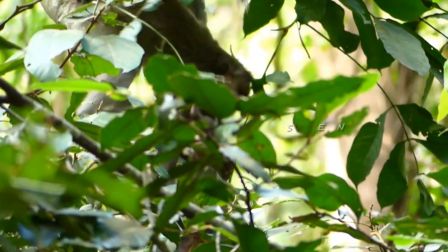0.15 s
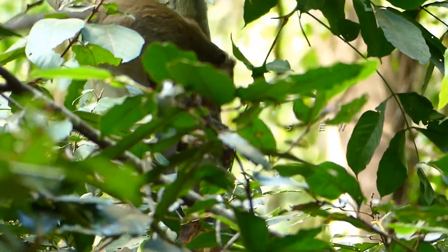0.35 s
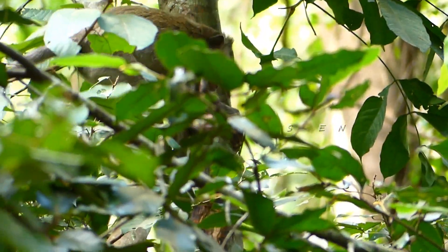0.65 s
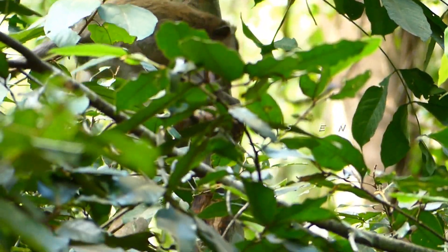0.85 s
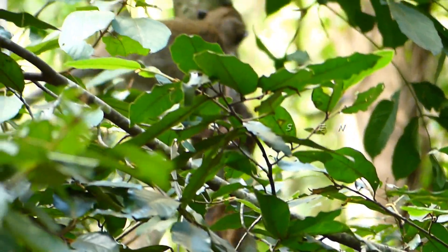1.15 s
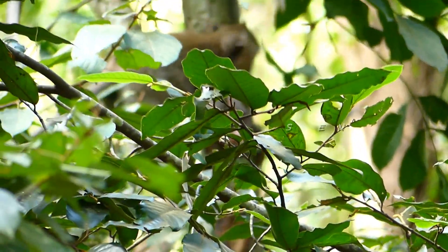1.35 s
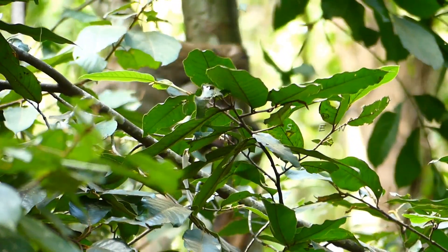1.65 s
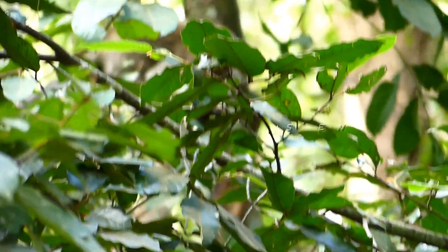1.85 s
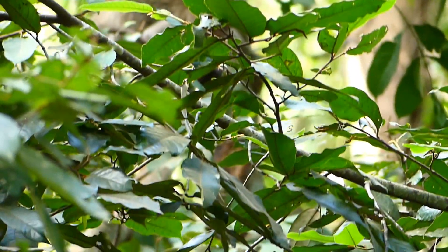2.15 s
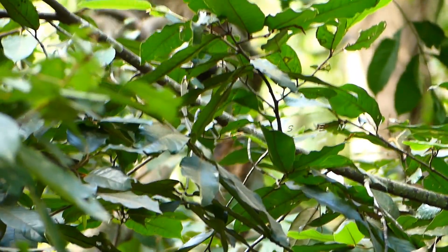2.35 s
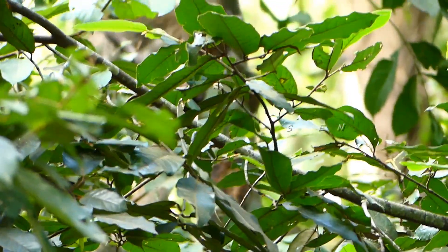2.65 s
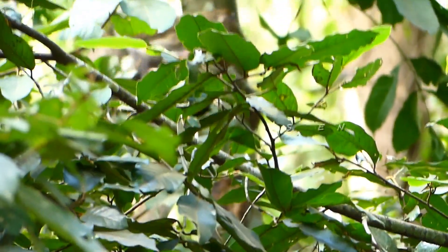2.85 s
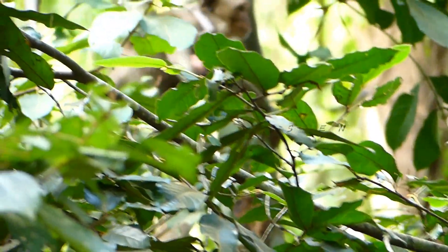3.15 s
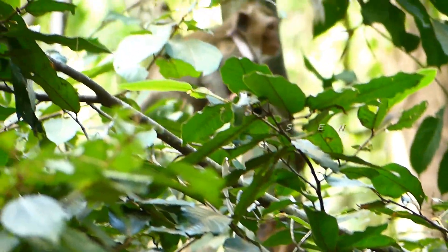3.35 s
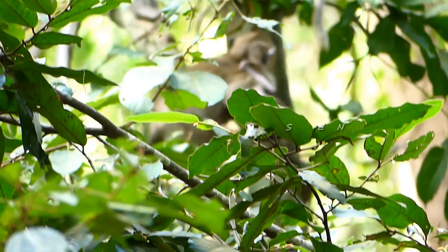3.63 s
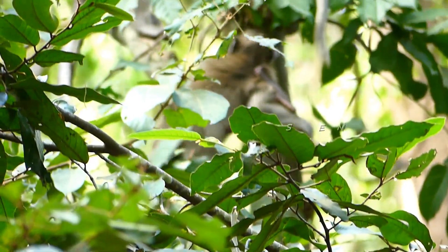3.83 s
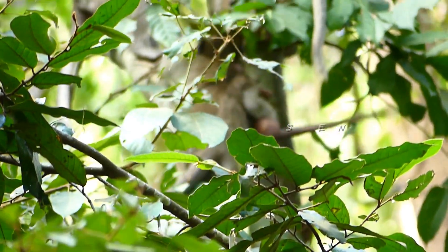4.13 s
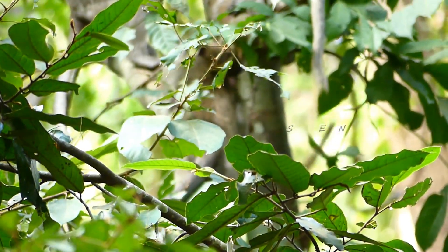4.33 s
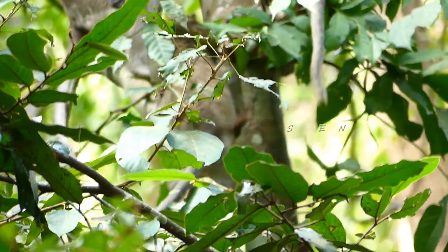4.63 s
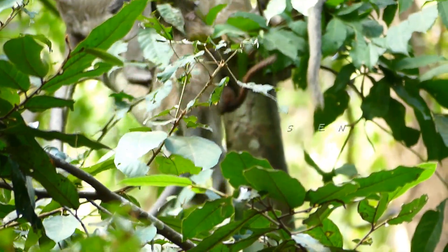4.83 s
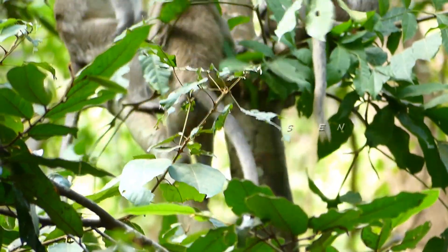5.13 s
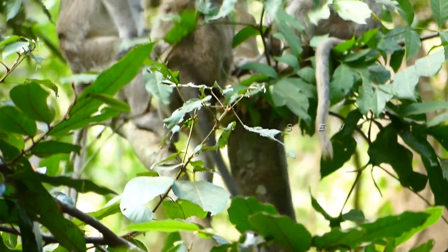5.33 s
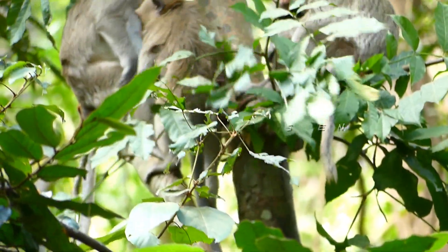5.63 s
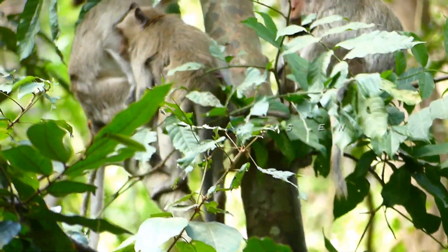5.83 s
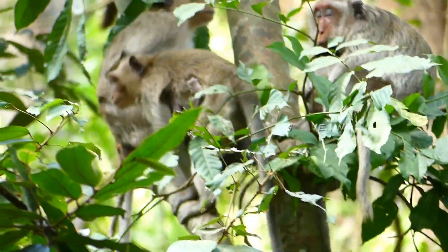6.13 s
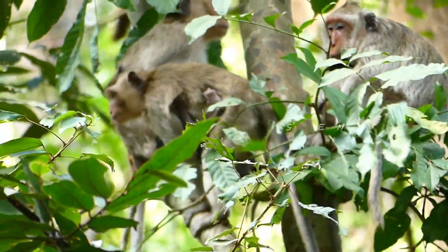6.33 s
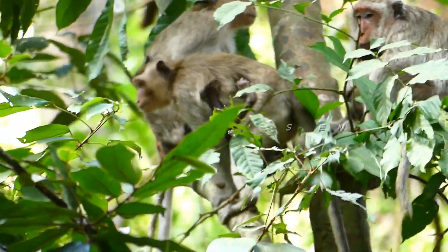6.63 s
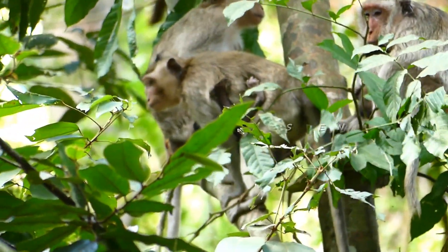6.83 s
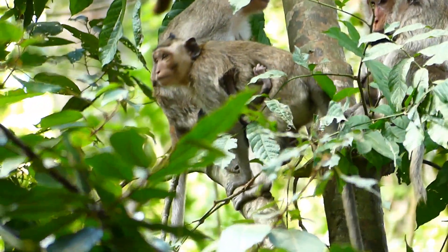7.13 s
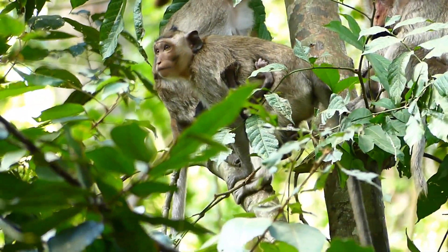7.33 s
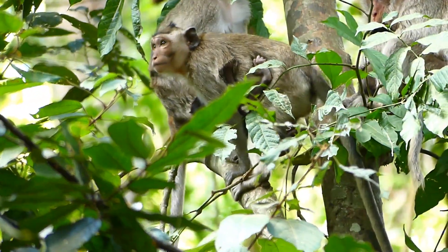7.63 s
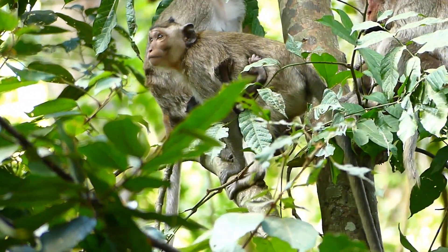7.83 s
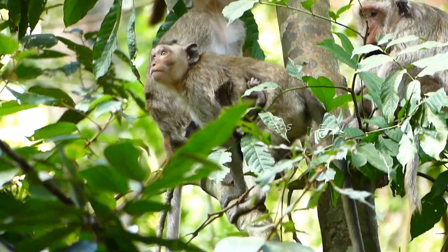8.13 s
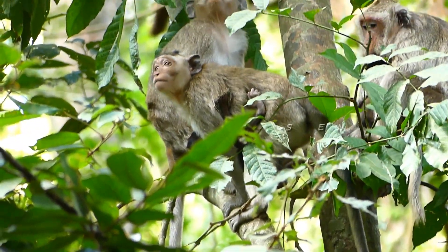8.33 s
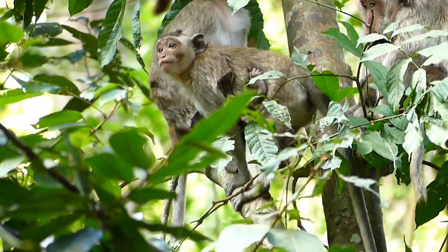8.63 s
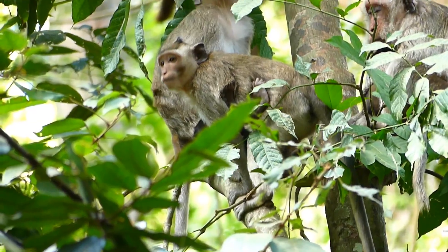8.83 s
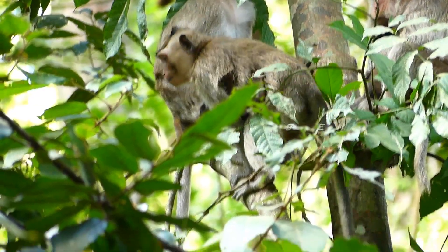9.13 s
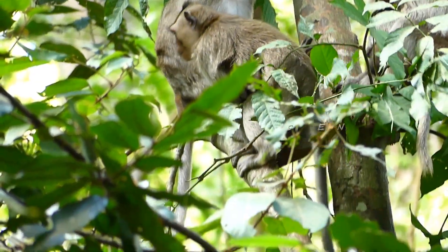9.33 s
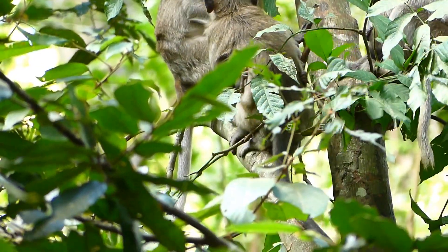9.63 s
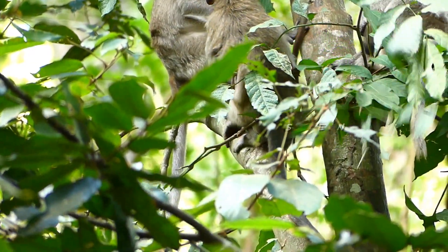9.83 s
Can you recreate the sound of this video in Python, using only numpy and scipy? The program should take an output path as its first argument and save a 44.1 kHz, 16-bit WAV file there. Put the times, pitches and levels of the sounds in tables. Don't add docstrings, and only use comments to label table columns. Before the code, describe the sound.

Several forest birds give short, high whistles that mostly slide downward, some clear and some slightly hoarse, thickest around three to four seconds. Leaves and branches rustle in short bursts, with crisp scrapes and twig ticks close by. Later, faint rising chirps repeat steadily, and a few sharp dry clicks come near the end. Dense woodland with soft scattered echoes, a faint steady hush, and a near-mono camera microphone.

```python
import sys
import numpy as np
from scipy import signal
from scipy.fft import rfft, irfft
from scipy.io import wavfile
from scipy.ndimage import uniform_filter1d

SR = 44100
rng = np.random.default_rng(int(sys.argv[2]) if len(sys.argv) > 2 else 0)


def int16_out(signal):
    q = np.round(np.clip(np.atleast_2d(signal).T, -1, 1) * 32767)
    wavfile.write(sys.argv[1], SR, q.astype(np.int16))


def linear_from_db(decibels):
    return 10 ** (np.asarray(decibels, float) / 20)


N = 440118

# f/Hz, level per Hz/dB
HUSH_COLOUR = [(25, -28), (90, -23), (150, -8.5), (280, -25.5), (480, -7.5), (640, -20), (1200, 2),
               (2400, -25), (3000, -11.5), (3650, -16), (4500, -14.5), (7500, -16.5), (9300, -16.5),
               (15600, -30)]
# f/Hz, side minus middle level/dB
SIDE_SPREAD = [(60, -4.5), (150, -17.5), (380, -10), (950, -19.5), (2380, -20), (5980, -19.5), (15000, -5)]
# centre f/Hz, reach below/octaves, reach above/octaves
FOLIAGE_COLOUR = [
    (1164, 0.48, 0.34),
    (2775, 0.54, 0.15),
    (4610, 0.16, 0.53),
    (9400, 0.87, 0.18),
]
# t/s, level/dB, hold/s
BRANCH_SHAKES = [(0.276, -75.5, 0.042), (0.555, -75.5, 0.018), (0.807, -72, 0.77), (1.713, -69.5, 0.55),
                 (2.28, -77.5, 0.039), (2.55, -70, 0.42), (3.097, -74, 0.23), (3.43, -72.5, 0.2),
                 (3.8, -69.5, 0.015), (4.403, -63.5, 0.14), (5.127, -71.5, 0.074), (5.475, -66, 0.014),
                 (5.887, -80, 0.028), (6.293, -77.5, 0.048), (6.632, -72.5, 0.25), (7.06, -75.5, 0.44),
                 (7.744, -66, 0.027), (8.124, -64, 0.43), (8.905, -70, 0.025), (9.152, -76.5, 0.51)]
BROAD_LEAF_SHAKES = [(0., -79.5, .03), (.24, -75, 0.1), (.58, -68, 0.29), (.94, -65.5, 0.073),
                     (1.55, -78, 0.23), (1.9, -67.5, 0.24), (2.27, -58, 0.096), (2.463, -54, 0.086),
                     (2.68, -69, 0.26), (3.04, -68, 0.016), (3.419, -63, 0.23), (4.37, -63.5, 0.16),
                     (4.939, -61.5, 0.46), (5.72, -73.5, 0.58), (6.27, -57, 0.15), (6.7, -79.5, 0.48),
                     (7.5, -83, 0.66), (8.17, -80.5, 0.41), (8.741, -72.5, 0.054), (8.95, -75.5, 0.44),
                     (9.681, -71.5, 0.072)]
SMALL_LEAF_SHAKES = [(0., -85.5, 0.08), (.23, -87, 0.059), (.58, -91, 0.023), (1.14, -65.5, 0.033),
                     (1.36, -86.5, .05), (1.52, -59.5, 0.15), (1.85, -58.5, 0.5), (2.66, -68.5, 0.12),
                     (3.04, -56, 0.17), (3.44, -81, 0.023), (3.799, -83, .03), (4.56, -71.5, 0.058),
                     (4.95, -82, 0.037), (5.15, -65.5, 0.15), (5.319, -71, 0.015), (5.899, -80.5, 0.29),
                     (6.84, -80, 0.17), (7.4, -89, 0.26), (8., -81, 0.33), (8.74, -79, 0.046),
                     (9.349, -90, .35)]
DRY_LEAF_SHAKES = [(.23, -109, 0.022), (0.562, -66.5, 0.95), (1.7, -72, .05), (1.92, -67.5, 0.12),
                   (2.47, -59.5, 0.03), (3.04, -55, 0.069), (3.121, -51.5, .12), (3.3, -57.5, .05),
                   (3.42, -56.5, 0.026), (3.801, -54.5, 0.026), (4.38, -77, 0.15), (6.1, -75, 0.055),
                   (6.269, -66, 0.23), (6.94, -71.5, 0.093), (7.789, -66.5, 0.0074), (9.5, -78.5, 0.035),
                   (9.68, -73, 0.06)]
# swell/dB per s, settle/dB per s, rest level/dB
FOLIAGE_SETTLING = [
    (71.66, 44, -100.5),
    (84, 110.5, -99),
    (84, 102.5, -92),
    (110, 136.5, -105),
]
# f/Hz, level/dB
RUSTLE_COLOUR = [(300, -4.5), (500, 1), (640, -8.5), (850, 3.5), (3100, -5), (3620, -0.5), (4050, 0),
                 (5800, -4), (7500, -14.5), (8600, 0), (15200, 3), (15900, -25.5)]
# t/s, peak level/dB, centre
# f/Hz, breadth/octaves, length/s
TWIG_SNAPS = [(.212, -42, 5770, 0.53, 0.0048), (.25, -47, 3950, 0.19, 0.0046),
              (.251, -56.5, 1376, 0.28, 0.014), (.791, -51, 3130, 0.14, 0.0017),
              (.948, -47.5, 11400, 0.34, 0.0021), (1.913, -56, 2300, 0.18, 0.014),
              (2.773, -40.5, 2920, 0.17, 0.0036), (3.623, -48, 2320, 1.06, 0.022),
              (4.021, -56, 14200, 0.099, 0.002), (6.784, -56.5, 3430, 0.17, 0.014),
              (7.652, -37.5, 4340, 0.46, 0.0043), (8.714, -63.5, 7560, 0.068, 0.011),
              (6.805, -69, 6230, 0.13, .015), (3.618, -36.5, 13500, 0.39, 0.0039)]
DRY_TICKS = [
    (2.769, -42, 3016, .3, 0.00059),
    (9.3695, -37.5, 12840, 0.33, 0.00063),
    (9.429, -36, 12100, 0.25, 0.00031),
    (9.4888, -47, 13700, 0.12, 0.00051),
    (9.5467, -32, 12400, 0.23, 0.000077),
    (9.5475, -30, 10650, 0.32, 0.00073),
    (9.6323, -36.5, 4530, 0.5, 0.00032),
]
SCRAPES = [(.804, -49.5, 11400, 0.13, 0.04), (1.25, -61.5, 4240, 0.042, 0.19),
           (1.69, -52.5, 9260, 0.052, 0.035), (1.787, -51.5, 4220, 0.075, 0.037),
           (2.031, -44.5, 9800, 0.33, 0.037), (2.993, -34, 12070, 0.4, 0.043),
           (3.125, -27, 5455, 0.5, 0.058), (6.24, -45, 2214, 0.23, 0.034),
           (8.03, -62.5, 10750, 1.1, .052), (9.42, -65.5, 5920, .08, 0.056),
           (1.02, -65, 4150, 0.046, .12), (1.63, -54, 8900, 0.073, 0.039),
           (1.76, -56, 9200, .08, 0.054), (3.77, -43, 4590, .12, 0.032),
           (6.81, -72, 6000, 0.14, 0.039), (9.87, -76, 5400, 0.16, 0.057), (3.3, -50, 14200, .1, .09),
           (3.84, -34, 4700, .3, .03), (4.38, -50, 9000, .12, .05)]
# turn t/s, lead/s, slide/s, hold/s, slide bend
WHISTLE_TIMES = [(1.12, 0.1, .35, 0.0036, 1.6), (2.258, 0.1, 0.3, 0.043, 1.89),
                 (3, 0.12, 0.135, 0.015, 1.5), (3.039, 0.016, 0.054, .04, 1.1),
                 (3.232, 0.034, 0.039, 0.024, 2), (3.635, 0.022, 0.17, 0.0056, 0.98),
                 (3.811, 0.008, 0.031, 0.006, 0.75), (4.26, 0.13, 0.114, 0.016, 1.8),
                 (5.106, 0.077, 0.043, 0.13, 2.4), (6.268, 0.095, 0.14, 0.15, 1.15),
                 (6.921, 0.095, 0.0684, 0.024, 1.53), (7.597, 0.019, 0.062, 0.0013, 1.32),
                 (3.395, 0.06, 0.014, 0.02, 1.2), (7.425, 0.005, .125, 0.0051, 1.1),
                 (5.284, 0.017, 0.11, .01, 1.07), (3.181, .01, 0.063, 0.042, 1.1),
                 (4.394, .02, 0.036, .03, 1.13), (3.01, .014, 0.19, .03, 1.1), (3.04, .015, .2, .03, 1),
                 (3.38, .02, 0.063, .03, 0.73)]
# start f/Hz, turn f/Hz, landing f/Hz
WHISTLE_PITCH = [(8240, 7850.5, 4480.5), (7070, 7738, 3765.5), (5180, 6820, 4950), (3620, 4122, 4616.5),
                 (6300, 6632, 6603), (4150, 4600.5, 4049.5), (6300, 5999.5, 4098.5), (5480, 7600, 5249.5),
                 (5170, 5155, 3708), (6300, 6666, 3863.5), (3935, 3774.5, 3627), (5900, 6421, 4498),
                 (6960, 7397.5, 7114), (4030, 4022, 6042.5), (3610, 3449.5, 2547.5), (3950, 3849.5, 3752),
                 (5200, 3820, 3720), (11900, 12300, 11100), (8300, 8500, 8900.5), (10800, 11300.5, 10900)]
# start level/dB, turn level/dB, landing level/dB
WHISTLE_EFFORT = [(-57, -41, -49), (-52.5, -41.5, -43), (-70.5, -50, -37.5), (-55, -33.5, -47.5),
                  (-30, -37.5, -56), (-51.5, -52, -47.5), (-56.5, -38.5, -22.5), (-76, -53.5, -35),
                  (-60.5, -53, -39), (-68, -52.5, -35), (-71.5, -44, -43.5), (-53, -57, -44.5),
                  (-51.5, -41.5, -36.5), (-68, -63, -55), (-57, -47.5, -62), (-46.5, -36.5, -43.5),
                  (-40, -33.5, -42), (-56, -47, -49), (-60, -52, -53), (-63.5, -57, -60.5)]
SECOND_HARMONIC = [-3.5, -5.5, -6, -14, -12, 8.5, -4, -3.5, -7.5, -3.5, -8, -2, -36, -45, -46, -25, -8, -45,
                   -45, -46]
THIRD_HARMONIC = [-41, -20, -26, -12, -45, 0, -37, -19, -33, -31, -29.5, -46.5, -60, -60, -65, -23, -35,
                  -58, -60, -60]
WHISTLE_HOARSENESS = [.004, .005, .006, .011, .014, .018, .022, .006, .007, .006, .009, .005, .009, .004,
                      .012, .01, .007, .028, .03, .02]
WHISTLE_LINGER = [.05, .4, .05, .05, .05, 0.039, .05, .05, 0.072, .6, .05, 0.071, .05, 0.044, .05, .05, .05,
                  .05, .05, .05]
WHISTLE_ECHO = [-0.4, 0.4, -0.5, -2.5, -1.5, -0.4, -9, .1, 2.5, 1, -0.5, 1.6, -4, -6, -3.8, -3.5, -3.5,
                -2.5, -2.5, -2.5]
# start t/s, length/s, from f/Hz, to f/Hz, peak level/dB
LONG_SWEEPS = [
    (2.856, 0.23, 3030, 2015, -46),
    (5.518, 0.31, 3275, 2017, -48),
    (5.871, .25, 3130, 2074, -46),
]
QUICK_DROPS = [
    (2.856, 0.013, 3085, 2760, -28.5),
    (3.42, 0.03, 7050, 4690, -50.5),
    (3.7, 0.092, 3973, 3470, -37),
    (4.238, 0.046, 7750, 4460, -44),
    (5.492, 0.052, 7180, 4600, -46),
    (7.484, 0.045, 7330, 4330, -51),
    (8.259, 0.048, 6880, 4560, -45),
    (8.816, 0.013, 3950, 5730, -50),
    (7.645, 0.015, 4710, 2750, -43.5),
]
RISING_NOTES = [
    (7.75, 0.14, 4150, 6200, -59),
    (8.051, 0.14, 4220, 6230, -56),
    (8.33, 0.11, 4030, 6300, -51.5),
    (8.62, 0.14, 4010, 6100, -56.5),
    (8.95, 0.11, 3890, 5940, -62),
    (9.25, 0.14, 3960, 6190, -61.5),
    (9.572, 0.12, 4000, 5880, -62),
]
DYING_NOTES = [
    (3.397, 0.015, 3320, 2560, -53),
    (3.825, 0.06, 3480, 2350, -50),
    (4.412, 0.039, 3300, 2576, -41),
    (5.824, 0.026, 4904, 4370, -39),
    (6.02, 0.048, 4760, 4340, -57.5),
    (7.138, 0.03, 1860, 2110, -69.5),
    (7.9, 0.056, 1910, 2270, -72),
    (8.18, 0.031, 1940, 1990, -75),
    (8.814, .02, 3900, 4300, -53),
]
# glide bend, place of the peak (0-1), onset level/dB, end level/dB, echo level/dB
NOTE_KINDS = [
    (4.2, 0.32, 0, -18.5, -1.5),
    (1.3, .42, -9, -7.5, -1.06),
    (0.95, 0.58, -7.5, -21.5, -3.5),
    (3.7, 0.22, 0.5, -23.5, -5),
]
# f/Hz, level/dB
WINDPIPE_COLOUR = [(2000, 5.5), (2800, 0), (3700, 1), (5000, -3), (6500, 7.5), (7600, 0), (8400, -11.5),
                   (9500, -2.5), (11500, 2), (13500, 4), (14800, -1), (15700, -9)]
# f/Hz, time to fall 60 dB/s
TREE_DECAY = [(1500, 0.98), (2500, 0.86), (3700, 0.43), (5500, 0.4), (8000, 0.42), (14000, 0.26)]


def evened(x):
    return x / np.sqrt(np.mean(x ** 2) + 1e-20)


def read(points, hz):
    f, value = np.transpose(points)
    return np.interp(np.log(hz + 1), np.log(f + 1), value)


def add(mix, s, sound):
    part = mix[round(s * SR):][:len(sound)]
    part += sound[:len(part)]


def noise(power, size, patchy_db, flicker_db):
    frames = 4 * N // size + 5
    hz = np.fft.rfftfreq(size, 1 / SR)[:, None]
    t = np.arange(frames) * size / 4 / SR
    a, b, c, d, patches = rng.standard_normal((frames, len(hz), 5)).T
    patches = uniform_filter1d(patches, 5, axis=0)
    patches = evened(uniform_filter1d(patches, 18, axis=1))
    flicker = evened(uniform_filter1d(rng.standard_normal(frames), 4))
    middle = a + 1j * b
    side = (c + 1j * d) * linear_from_db(read(SIDE_SPREAD, hz))
    z = np.array([middle, side])
    z *= np.sqrt(power(hz, t)) * linear_from_db(patchy_db * patches + flicker_db * flicker)
    return signal.istft(z, nperseg=size, noverlap=3 * size // 4)[1][:, :N]


def hush():
    def steady(hz, t):
        return linear_from_db(2 * read(HUSH_COLOUR, hz)) + 0 * t
    air = noise(steady, size=1024, patchy_db=1.5, flicker_db=.4)
    return linear_from_db(-80.5) * air / np.std(air[0])


def shaking_db(shakes, swell, settle, rest_db, t):
    s, db, hold = np.transpose(shakes)[..., None]
    early = np.maximum(s - t, 0)
    late = np.maximum(t - s - abs(hold), 0)
    each_db = db - swell * early - settle * late
    return 10 * np.log10(linear_from_db(2 * each_db).sum(0) + linear_from_db(2 * rest_db))


def foliage(hz, t):
    parts = [BRANCH_SHAKES, BROAD_LEAF_SHAKES, SMALL_LEAF_SHAKES, DRY_LEAF_SHAKES]
    levels_db = [shaking_db(shakes, *way, t) for shakes, way in zip(parts, FOLIAGE_SETTLING)]
    power = 0
    for (centre_hz, below, above), db in zip(FOLIAGE_COLOUR, levels_db):
        octaves = np.log2((hz + 1) / centre_hz)
        reach = np.where(octaves < 0, below, above)
        bell = np.exp(-.5 * (octaves / reach) ** 2) * linear_from_db(2 * read(RUSTLE_COLOUR, hz))
        power = power + bell / bell.sum() * linear_from_db(2 * db)
    creak = np.exp(-.5 * (np.log2((hz + 1) / 480) / 0.13) ** 2)
    creak_db = 0.61 * levels_db[0] - 49.5
    return power * 0.5 + creak * linear_from_db(2 * creak_db)


def twigs(rows, echo_db):
    direct = np.zeros(N)
    size, lead_in = 8192, 200
    t, f = np.arange(size) / SR, np.fft.rfftfreq(size, 1 / SR)
    grits = rng.standard_normal((len(rows), size))
    for (s, db, hz, octaves, length), grit in zip(rows, grits):
        shape = np.roll(t / length * np.exp(-t / length * 2), lead_in)
        band = np.exp(-.5 * (np.log2((f + 1) / hz) / octaves) ** 2) * linear_from_db(read(RUSTLE_COLOUR, f))
        crack = irfft(rfft(grit * shape) * band)
        add(direct, s - lead_in / SR, crack * linear_from_db(db) / abs(crack).max())
    return np.array([direct, direct * linear_from_db(echo_db)])


def whistle(times, pitch, effort, second_db, linger):
    turn, lead, slide, hold, bend = times
    start_hz, turn_hz, land_hz = pitch
    start_db, turn_db, land_db = effort
    s = np.arange(turn - lead, turn + slide + hold, 1 / 1000)
    before = np.clip((turn - s) / lead, 0, 1)
    after = np.clip((s - turn) / slide, 0, 1)
    hz = turn_hz + (start_hz - turn_hz) * before ** 3.4 + (land_hz - turn_hz) * after ** bend
    shelf_hz, shelf_width_hz = 5196, 740
    off_shelf = hz - shelf_hz
    hz -= np.clip(linger, 0, 1) * (after > 0) * off_shelf * np.exp(-(off_shelf / shelf_width_hz) ** 2)
    db = turn_db + (start_db - turn_db) * before ** 2.5
    db += (land_db - turn_db) * (1 - (1 - after) ** 1.3)
    db += -150 * np.maximum(s - turn - slide, 0)
    moving = abs(np.gradient(np.log(hz), s))
    db += -14 * (after > 0) * np.minimum(moving / 23, 1) ** 2
    late_db = -12.5 * after ** 4 * (1 - after ** 40)
    held_db = -13 * np.exp(-moving / 0.27)
    return s, hz, db, second_db + late_db + held_db


def chip(start, length, from_hz, to_hz, db, bend, place, onset_db, end_db):
    u = np.linspace(0, 1, num=40)
    hz = to_hz + (from_hz - to_hz) * (1 - u) ** bend
    swell_db = np.interp(u, [0, place, 1], [onset_db, 0, end_db])
    return start + length * u, hz, db + swell_db


def note(s, hz, db, overtones_db, hoarse, flutter):
    t = np.arange(s[0] - .004, s[-1] + 0.0025, 1 / SR)
    smooth = max(300, len(t) // 14)
    curves = [uniform_filter1d(np.interp(t, s, c), smooth, mode="nearest") for c in [hz, db, *overtones_db]]
    hz, db, *overtones_db = curves
    shake, throb = flutter[:, round(t[0] * SR):][:, :len(t)]
    slack = hoarse * (hz.max() / hz) ** 2
    phase = 2 * np.pi * np.cumsum(hz * (1 + slack * shake)) / SR
    tone = 0
    for k, over_db in enumerate([0, *overtones_db], 1):
        colour = linear_from_db(over_db + read(WINDPIPE_COLOUR, k * hz))
        below_top = np.clip((15900 - k * hz) / 300, 0, 1)
        tone += colour * below_top * np.sin(k * phase)
    tone *= 1 + np.minimum(15 * slack, 1) * throb
    fade = signal.windows.tukey(len(t), min(1, 0.017 / (t[-1] - t[0])))
    return t[0], np.sqrt(2) * linear_from_db(db - 3.5) * tone * fade


def birds():
    out = np.zeros((2, N))
    flutter = rng.standard_normal((2, N + SR))
    flutter = evened(signal.lfilter(*signal.butter(2, 250, fs=SR), flutter))
    flutter += .35 * evened(uniform_filter1d(uniform_filter1d(flutter, 700), 700))
    notes = []
    calls = zip(WHISTLE_TIMES, WHISTLE_PITCH, WHISTLE_EFFORT, SECOND_HARMONIC, WHISTLE_LINGER,
                THIRD_HARMONIC, WHISTLE_HOARSENESS, WHISTLE_ECHO)
    for *call, third_db, hoarse, echo_db in calls:
        s, hz, db, second_db = whistle(*call)
        notes.append((echo_db, *note(s, hz, db, [second_db, third_db + 0 * s], hoarse, flutter)))
    for rows, (*kind, echo_db) in zip([LONG_SWEEPS, QUICK_DROPS, RISING_NOTES, DYING_NOTES], NOTE_KINDS):
        for row in rows:
            notes.append((echo_db, *note(*chip(*row, *kind), [], .005, flutter)))
    for echo_db, s, tone in notes:
        add(out[0], s, tone)
        add(out[1], s, linear_from_db(echo_db) * tone)
    return signal.sosfilt(signal.butter(6, 1500, "high", fs=SR, output="sos"), out)


def forest(x, bend=1.204, clumpy_db=3.2):
    out = 0
    sway = np.arange(N) / SR * 9 * np.pi / 3
    for k in range(3):
        clumps = evened(uniform_filter1d(rng.standard_normal(SR), 130))
        onset = np.minimum(np.arange(SR) / 150, 1)
        taps = rng.standard_normal((2, SR)) * linear_from_db(clumpy_db * clumps) * onset
        hz, t, z = signal.stft(taps, SR, nperseg=256)
        z *= linear_from_db(-60 * (t / read(TREE_DECAY, hz)[:, None]) ** bend)
        z[1] *= linear_from_db(read(SIDE_SPREAD, hz))[:, None]
        tail = signal.istft(z, SR, nperseg=256)[1]
        tail = tail / np.linalg.norm(tail[0])
        share = np.sqrt(2 / 3) * np.cos(sway + k * np.pi / 3)
        out = out + signal.fftconvolve((x * share)[None], tail, axes=1)[:, :N]
    return out


def scene():
    air = hush()
    leaves = noise(foliage, size=512, patchy_db=2.8, flicker_db=2.2)
    cracks, crack_feed = twigs(TWIG_SNAPS, -1.5) + twigs(SCRAPES, -5) + twigs(DRY_TICKS, -9.5)
    song, song_feed = birds()
    echoes = linear_from_db(2.0) * forest(song_feed + crack_feed)
    mid = air[0] + leaves[0] + cracks + linear_from_db(-2.0) * song + echoes[0]
    side = air[1] + leaves[1] + .1 * cracks + echoes[1]
    return np.array([mid + side, mid - side])


def low_pass(x):
    return signal.sosfilt(signal.butter(12, 16670, fs=SR, output="sos"), x)


def record(dry):
    size = 512
    hz, t, z = signal.stft(dry, SR, nperseg=size, noverlap=3 * size // 4)
    power = uniform_filter1d(abs(z.mean(0)) ** 2, size=5, axis=0)
    power = uniform_filter1d(power, size=7, axis=1)
    kept = power / (power + linear_from_db(2 * -96.0))
    quiet = signal.istft(z * (0.58 + 0.5 * kept), SR, nperseg=size, noverlap=3 * size // 4)[1][:, :N]
    return low_pass(quiet)


dry = scene()
out = record(dry)
int16_out(out)
```